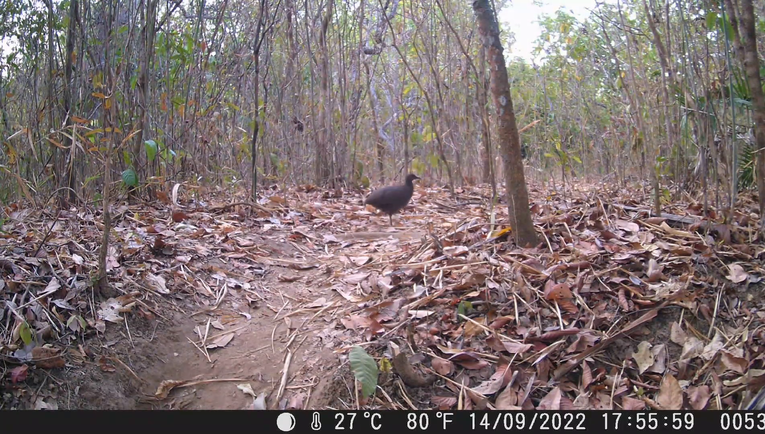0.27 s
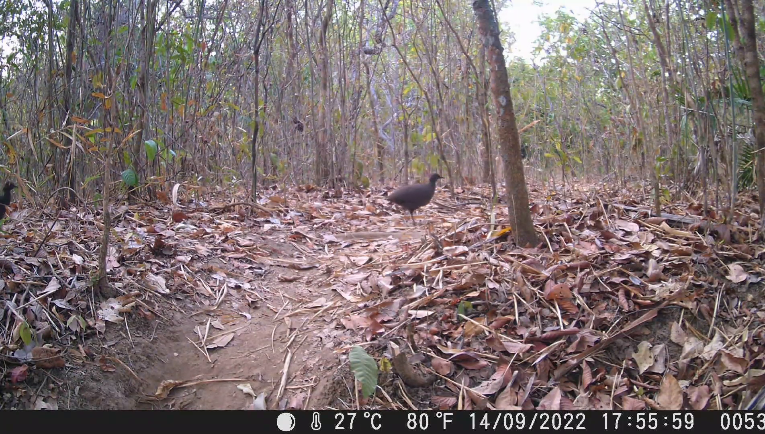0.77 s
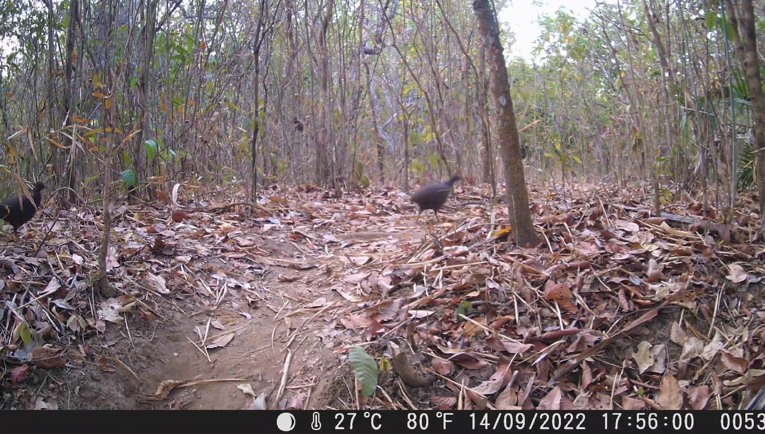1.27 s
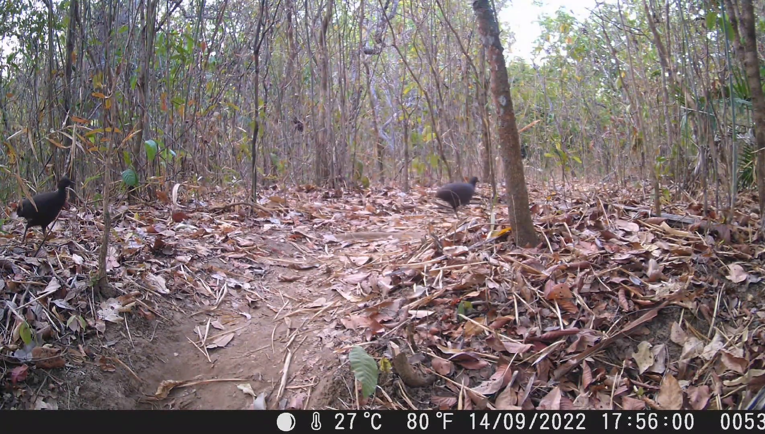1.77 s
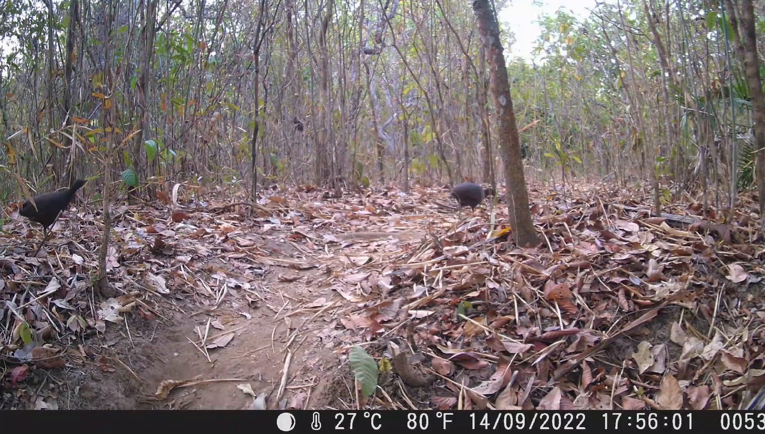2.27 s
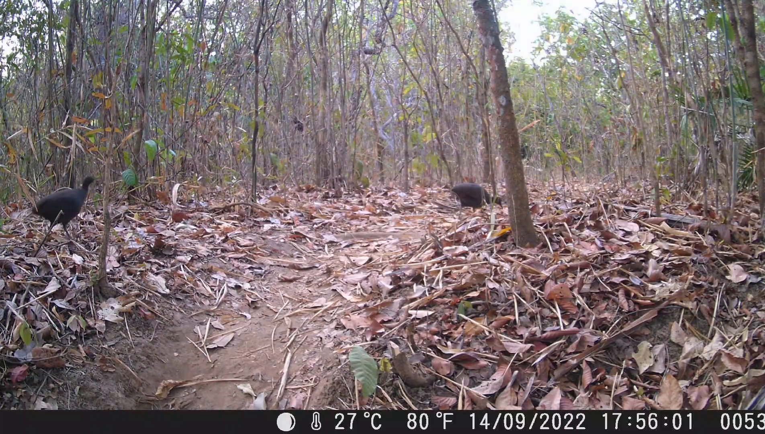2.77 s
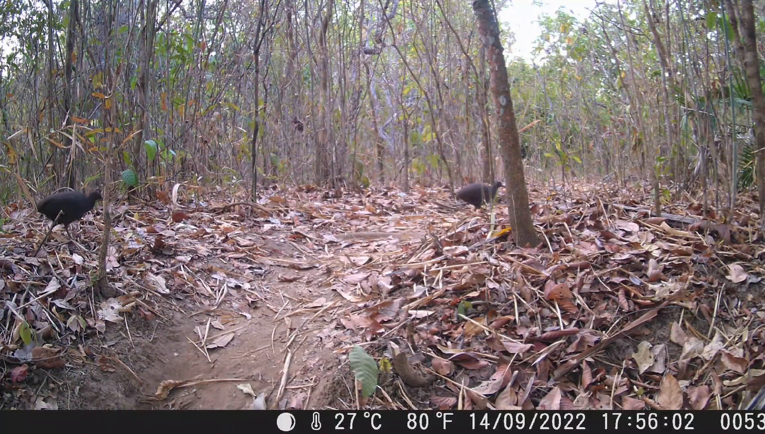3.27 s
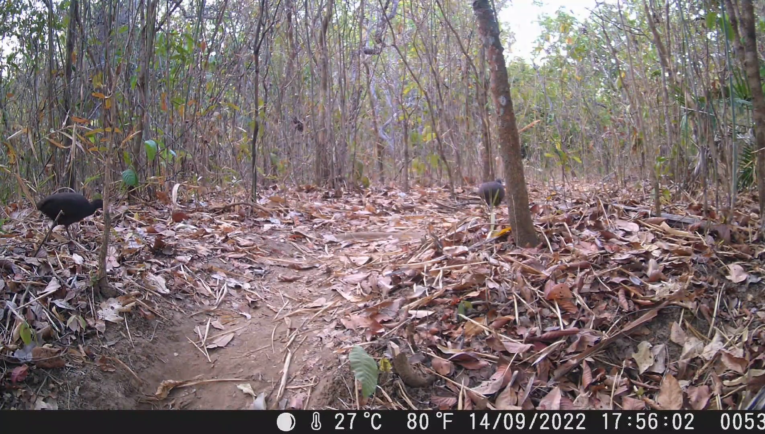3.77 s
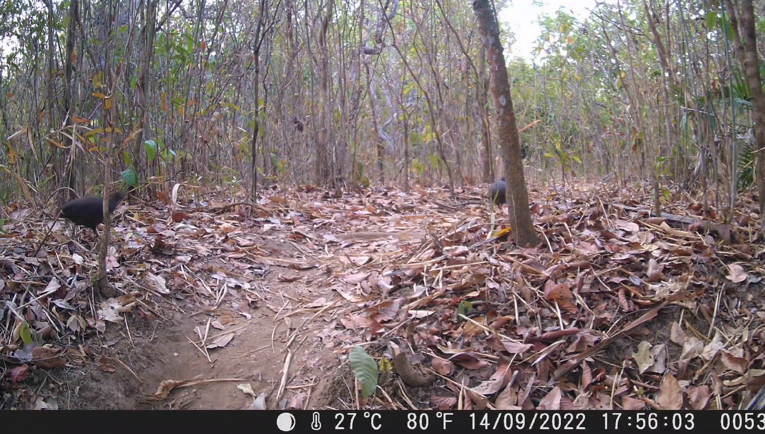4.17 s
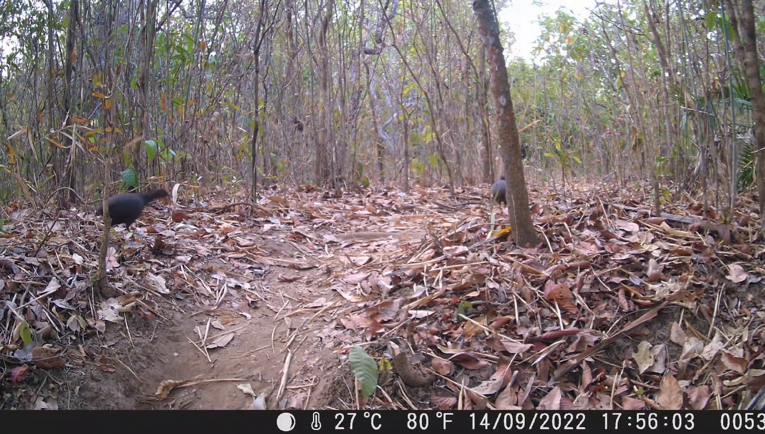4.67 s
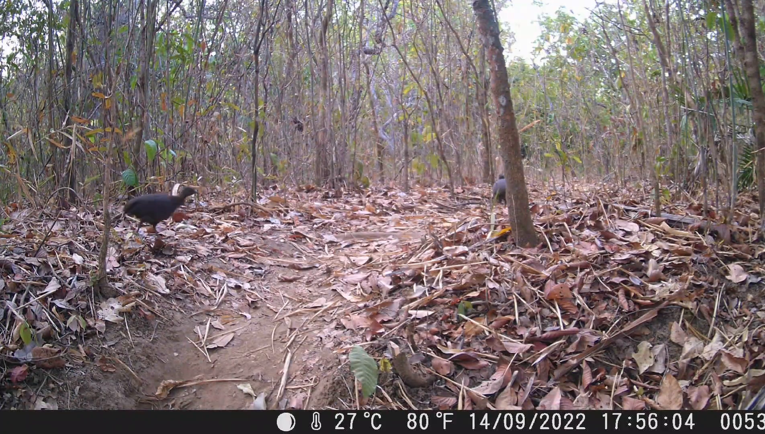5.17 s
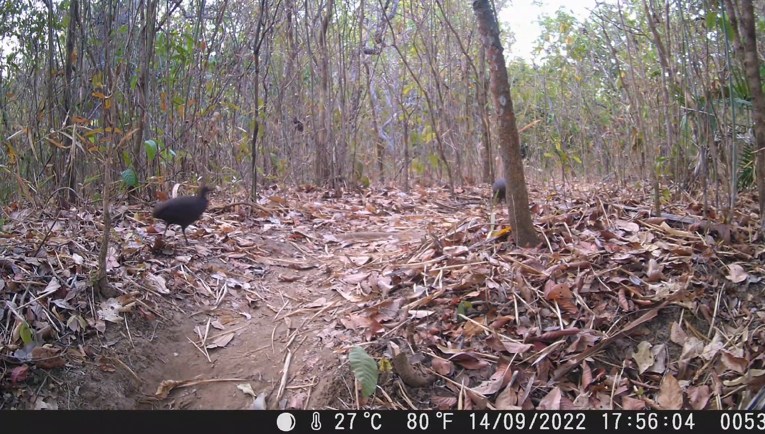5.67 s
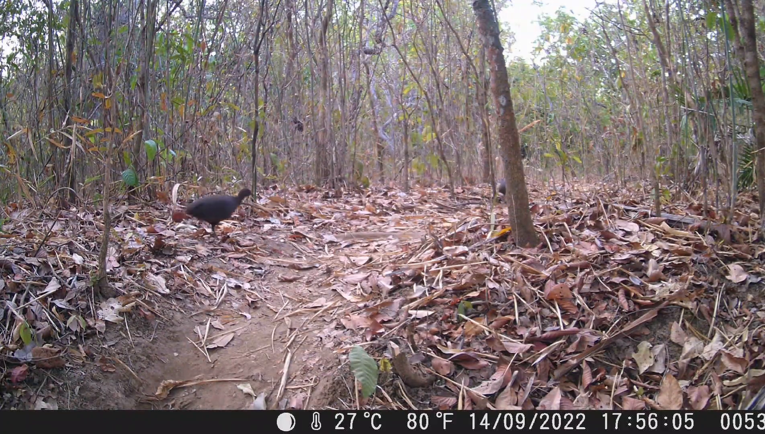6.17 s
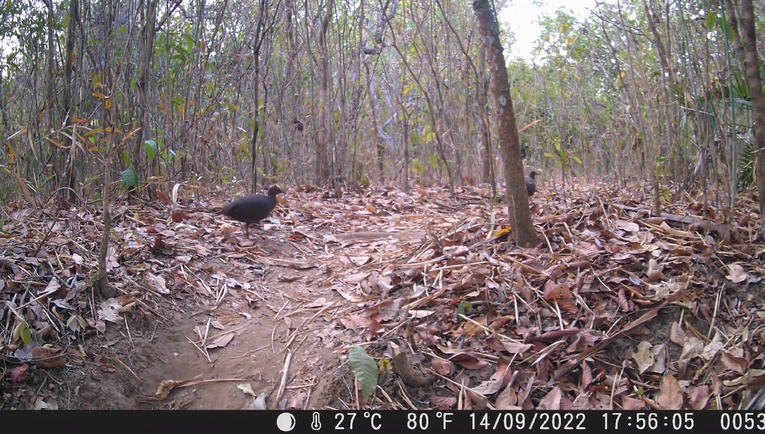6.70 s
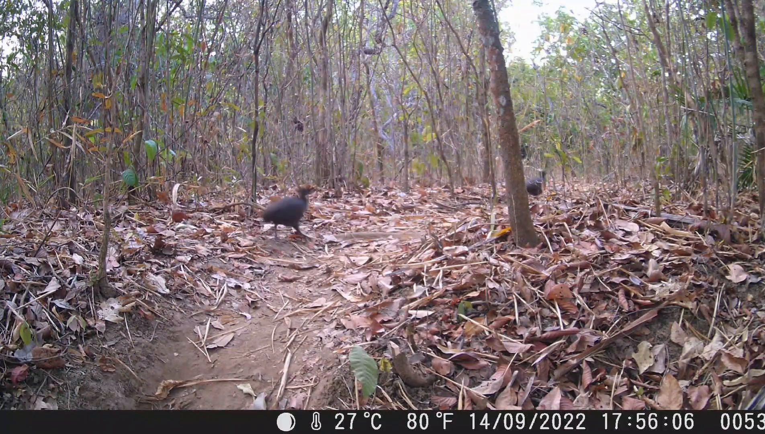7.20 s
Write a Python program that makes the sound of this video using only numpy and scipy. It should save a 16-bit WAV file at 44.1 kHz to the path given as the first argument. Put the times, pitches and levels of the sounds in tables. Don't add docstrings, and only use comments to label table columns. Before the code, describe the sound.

Pure bird pipes ring out singly, then a bubbling two-bird whistled duet bursts in mid-way, over far birdsong, faint dove coos, rumbling air and dry leaf clicks.

```python
import sys
import numpy as np
from scipy import signal
from scipy.fft import rfft, irfft
from scipy.io import wavfile
from scipy.ndimage import uniform_filter1d

SR = 44100
rng = np.random.default_rng(int(sys.argv[2]) if len(sys.argv) > 2 else 0)


def boost_factor(decibels):
    exponent = np.asarray(decibels, float) / 20
    return 10 ** exponent


def wrap_up_sound(samples):
    columns = np.atleast_2d(samples).T
    tamed = np.clip(columns, -1, 1)
    steps = np.round(tamed * 32767).astype(np.int16)
    wavfile.write(sys.argv[1], SR, steps)


N = 328104


def band(x, low_hz, high_hz, order=2):
    return signal.sosfilt(signal.butter(order, [low_hz, high_hz], "band", fs=SR, output="sos"), x)


def drift(rate):
    knots = rng.standard_normal(3000)
    return np.interp(np.arange(N) / SR * rate, np.arange(3000), knots) * 1.32


def tone(hz, gain, second_db):
    phase = 2 * np.pi * np.cumsum(hz) / SR
    return np.sqrt(2) * gain * (np.sin(phase) + boost_factor(second_db) * np.sin(2 * phase))


def arches(rows, effort, fade_s, second_db, throat=((1, 0), (2, 0)), bend=2.7):
    hz = np.zeros(N)
    for s, length, start, middle, end in rows:
        i = round(s * SR)
        u = np.linspace(-1, 1, round(length * SR))
        tilt = (end - start) / 2 * u
        arch = ((start + end) / 2 - middle) * abs(u) ** bend
        hz[i:i + len(u)] = middle + tilt + arch
    sung = np.flatnonzero(hz)
    gain = (hz > 0) * boost_factor(np.interp(np.arange(N) / SR, *np.transpose(effort)))
    hz = uniform_filter1d(np.interp(np.arange(N), sung, hz[sung]), size=90)
    width = max(round(fade_s * SR), 3)
    gain = uniform_filter1d(uniform_filter1d(gain, width), width)
    throat_gain = boost_factor(np.interp(hz, *np.transpose(throat)))
    return tone(hz, gain * throat_gain, second_db)


def trunks(x, t60, wet_db, gap_s):
    t = np.arange(SR) / SR
    tail = rng.standard_normal(SR) * boost_factor(-60 * t / t60) * np.clip(t / gap_s, 0, 1)
    tail /= np.sqrt(np.sum(tail ** 2))
    return boost_factor(wet_db) * signal.fftconvolve(x, tail)[:N]


def air():
    # (f/Hz, density/dB per Hz)
    air_colour = [(12, -32), (20, 8.5), (46, -4.5), (118, -16), (664, -31.5), (1120, -34.5), (2360, -39.5),
                  (3740, -46), (4700, -50), (5600, -51.5), (6400, -49), (7200, -48), (8100, -49),
                  (8800, -67.5)]
    hz = np.maximum(np.arange(N // 2 + 1) * SR / N, 1)
    corner_hz, corner_db = np.transpose(air_colour)
    colour = boost_factor(np.interp(np.log(hz), np.log(corner_hz), corner_db))
    noise = irfft(rfft(rng.standard_normal(N)) * colour, N)
    noise *= boost_factor(-50) / np.std(noise)
    rumble = band(noise, 21, 340, order=1)
    return noise + rumble * (boost_factor(2.1 * drift(rate=16)) - 1)


def haze():
    # (t/s, level/dB)
    flares = [(0, -50.5), (.21, -50.5), (.48, -52.5), (.63, -39.5), (.87, -45.5), (1.18, -58), (1.3, -41),
              (1.96, -53.5), (2.09, -49.5), (2.9, -51), (3.17, -70), (3.27, -72.5), (3.52, -60.5),
              (3.58, -50), (4.27, -60), (4.4, -44), (5.08, -59), (5.8, -60.5), (5.93, -52), (6.15, -52.5),
              (6.38, -54.5), (6.67, -58), (6.8, -55)]
    rise_db_per_s, fade_db_per_s = 217.5, 131.5
    chirps = np.zeros(N + 3000)
    u = np.linspace(0, 1, 900)
    for when, pitch, spread, bend in rng.random((2000, 4)):
        i = int(when * N)
        hz = (2700 + 760 * (pitch + spread)) * (1 + 0.3 * (bend - 0.75) * u)
        chirps[i:i + len(u)] += tone(hz, np.sin(np.pi * u), second_db=-28.5)
    t = np.arange(N) / SR
    slopes = [db - np.maximum(rise_db_per_s * (s - t), fade_db_per_s * (t - s)) for s, db in flares]
    haze_gain = boost_factor(np.max(slopes, axis=0) - 9.5)
    return haze_gain * trunks(chirps[:N], t60=0.21, wet_db=-2, gap_s=0.011)


def song_notes():
    # (t/s, length/s, f/Hz, fall/Hz, level/dB)
    closing = [(0, 0.23, 1195, 15, -77), (0, 0.014, 3795, 400, -48), (0.247, 0.031, 2473, 540, -54),
               (0.687, 0.028, 2960, 35, -57), (1.411, 0.099, 2122, 34, -52.5),
               (1.541, 0.075, 2079, 150, -56), (1.66, .13, 1995, 27, -68.5),
               (2.214, 0.056, 2340, 210, -55.5), (2.316, 0.099, 2460, 360, -64),
               (2.384, 0.057, 2118, 58, -59), (3.041, 0.042, 2405, 5, -66.5), (3.143, .053, 2370, 340, -65),
               (3.781, .084, 1977, 86, -59), (3.85, 0.13, 1892, 4.2, -62), (5.221, 0.066, 2420, 197, -61),
               (5.371, 0.035, 2390, 435, -63), (5.411, 0.038, 1932, 33, -58),
               (6.41, .039, 2817, 680, -63.5), (6.417, 0.034, 2167, 223, -58), (6.72, .08, 2866, 83, -60),
               (6.961, 0.048, 2030, 51, -58), (7.01, 0.053, 2345, 83, -64.5),
               (7.076, 0.066, 2336, 600, -64), (7.137, 0.076, 1930, 91, -61.5)]
    # (t/s, length/s, end f/Hz, level/dB)
    falls = [(0.876, .07, 2344, -61), (1.345, 0.054, 2181, -57), (2.086, .13, 2370, -59.5),
             (2.944, .074, 2545, -73), (3.656, 0.086, 2116, -60), (5.15, .083, 2460, -76),
             (6.815, 0.13, 2060, -59)]
    # (t/s, opening level/dB, tumble level/dB, body level/dB, time stretch)
    sung = [(.423, -59.5, -65.5, -57.5, 0.88), (1.107, -56, -52.5, -54, 0.96),
            (1.866, -56, -54, -52.5, 0.98), (2.697, -60, -82, -66.5, .99), (3.425, -59, -67, -59, 0.92),
            (4.201, -56, -68, -56.5, 1.06), (4.891, -65, -82, -68.5, 1.09), (5.726, -58, -60, -57.5, 1.06),
            (6.617, -57, -63.5, -57.5, 0.82)]
    # (t after its start/s, length/s, start f/Hz, end f/Hz, level in its part/dB)
    opening = [(.008, 0.017, 2285, 2373, 5)]
    tumble = [(.026, .037, 4516, 3450, -9), (.056, .032, 3423, 3285, -0.5)]
    body = [(.085, .065, 3120, 2910, -2.5), (.143, 0.031, 3630, 4005, -4), (.172, .068, 3600, 3380, 3)]
    # (t/s, opening start f/Hz, opening end f/Hz, opening level/dB, level of the rest/dB)
    sung_short = [(.141, 2167, 2100, -58.5, -64), (.785, 2060, 2360, -55, -58),
                  (6.07, 2410, 2310, -55.5, -60), (6.316, 1884, 2290, -56.5, -64)]
    # (t after its start/s, length/s, start f/Hz, end f/Hz, level/dB)
    short_phrase = [
        (.035, 0.04, 4040, 3520, -15.5),
        (.062, .05, 3135, 2786, -0.5),
    ]

    notes = [(s, length, hz, hz - fall, db) for s, length, hz, fall, db in closing]
    notes += [(s, length, 3230, hz, db) for s, length, hz, db in falls]
    for s, *parts_db, stretch in sung:
        for part, part_db in zip((opening, tumble, body), parts_db):
            notes += [(s + stretch * at, length, a, b, db + part_db) for at, length, a, b, db in part]
    for s, start, end, first_db, rest_db in sung_short:
        notes.append((s, 0.03, start, end, first_db))
        notes += [(s + at, length, a, b, db + rest_db) for at, length, a, b, db in short_phrase]
    return [(*note, boost_factor(db)) for *note, db in notes]


def far_song():
    song = np.zeros(N)
    quaver = 1 + 0.005 * drift(rate=250)
    for s, length, start, end, gain in song_notes():
        i = round(s * SR)
        u = np.linspace(0, 1, round(length * SR))
        edge = np.clip(4 * np.minimum(u, 1 - u), 0, 1)
        hz = (start + (end - start) * u) * quaver[i:i + len(u)]
        octave_db = np.interp(hz, [2000, 4000], [-14, -28]) - abs(end - start) / 110
        song[i:i + len(u)] += tone(hz, edge * gain, second_db=octave_db)
    near_trunks = trunks(song, t60=0.4, wet_db=1.5, gap_s=0.0077)
    far_trunks = trunks(song, t60=0.68, wet_db=-6, gap_s=0.13)
    return boost_factor(-4) * song + near_trunks + far_trunks


def cricket():
    # (first group t/s, group period/s, group length/s, pulse rate/Hz)
    strokes = (.07, .2003, .115, 34)
    first, period, length, rate = strokes
    group, t = np.divmod(np.arange(N) / SR - first + period, period)
    strength = boost_factor(-87 + 4.2 * rng.standard_normal(60))[group.astype(int)]
    pulses = np.sin(np.pi * rate * t) ** 2 * (t < length) * boost_factor(3.3 * drift(rate=99))
    return 12 * strength * pulses * band(rng.standard_normal(N), 7650, 8350)


def leaves():
    # (t/s, bright peak level/dB, dull part relative level/dB)
    ticks = [
        (0.458, -70, 8),
        (0.642, -61, 2.5),
        (.779, -74, 6),
        (1.136, -75.5, 18),
        (2.477, -59, -4),
        (2.71, -67.5, 2),
        (6.348, -86, 14),
    ]
    # (t/s, level/dB)
    rustle = [(0, -94), (.5, -91.5), (1.199, -93.5), (1.6, -104), (2.499, -103), (2.997, -108),
              (7.44, -106)]
    bright, dull = np.zeros((2, N))
    for s, db, dull_db in ticks:
        i = round(s * SR)
        bright[i] = boost_factor(db)
        dull[i] = boost_factor(db + dull_db)
    sizes_db = np.interp(np.arange(N) / SR, *np.transpose(rustle))
    sizes_db += 3.3 * np.minimum(rng.exponential(1, N), 3.5)
    patter = (rng.random(N) < 1200 / SR) * boost_factor(sizes_db)
    fade = np.exp(-1 / (0.005 * SR))
    noise = rng.standard_normal((2, N))
    bright_decay = signal.lfilter([1], [1, -fade], bright + 0.85 * patter)
    dull_decay = signal.lfilter([1], [1, -fade], dull + patter)
    crackle = band(noise[0] * bright_decay, 3500, 8000)
    return crackle + 4 * band(noise[1] * dull_decay, 730, 3500)


def piper():
    # (full voice t/s, hold/s, f/Hz, slide down from above/Hz, level/dB)
    piping = [
        (.736, 0.044, 2426, 1, -31.5),
        (1.309, 0.073, 2560, 125, -29.5),
        (3.867, 0.039, 2416, 1, -24.5),
        (4.434, 0.085, 2530, 150, -28),
    ]
    # (delay t/s, level/dB)
    echo_taps = [
        (.045, -20.5),
        (0.129, -34.5),
        (.19, -47),
    ]
    swell_s, swell_db, swell_bend = 0.09, -35.5, 1.49
    release_s, release_db, slide_s = 0.025, -29.5, 0.045
    tire_db_per_s = 11.5
    piped = np.zeros(N)
    for s, hold, hz, slide, db in piping:
        t = np.arange(N) / SR - s
        before = np.maximum(-t / swell_s, 0)
        after = np.maximum((t - hold) / release_s, 0)
        note_db = db + swell_db * before ** swell_bend + release_db * after ** 1.1
        note_db -= tire_db_per_s * np.maximum(t, 0)
        glide = hz + slide * np.exp(-np.maximum(t + swell_s, 0) / slide_s)
        piped += tone(glide, boost_factor(note_db), second_db=-45.5)
    echoes = sum(boost_factor(db) * np.roll(piped, round(delay * SR)) for delay, db in echo_taps)
    echoes = echoes * boost_factor(4.3 * drift(rate=40))
    return piped + echoes + trunks(piped, t60=0.34, wet_db=-29.5, gap_s=0.07)


def dove():
    # (t/s, level/dB)
    calls = [
        (1.071, -56.5),
        (2.93, -68),
        (5.812, -56.5),
    ]
    # (t after its start/s, length/s, start f/Hz, middle f/Hz, end f/Hz)
    coo_shape = [
        (0, .115, 312, 398.3, 418),
        (0.188, 0.034, 399, 400, 380),
    ]
    voice = np.zeros(N)
    for s, db in calls:
        rows = [(s + at, *arch) for at, *arch in coo_shape]
        voice += arches(rows, [(s, db)], fade_s=0.009, second_db=-28)
    return voice + trunks(voice, t60=0.16, wet_db=-5.5, gap_s=0.014)


def duet():
    # (t/s, length/s, start f/Hz, middle f/Hz, end f/Hz)
    first_bird = [(2.690, .045, 1829, 1852, 1855), (2.720, 0.032, 1806, 1786, 1762),
                  (2.754, 0.088, 1676, 1828, 1751), (2.848, .03, 1692, 1758, 1451),
                  (2.993, 0.033, 1414, 1524, 1600), (3.023, 0.06, 1552, 1735, 1599),
                  (3.490, 0.052, 1895, 1800, 1839), (3.552, .078, 1754, 1852, 1609),
                  (3.630, 0.041, 1410, 1600, 1171), (3.782, 0.029, 1208, 1437, 1415),
                  (3.812, 0.051, 1390, 1640, 1298)]
    second_bird = [(3.290, 0.053, 1763, 1790, 1448), (3.348, 0.066, 1406, 1808, 1480),
                   (3.432, .060, 1367, 1660, 1733), (3.492, 0.088, 1722, 1740, 1773),
                   (3.542, .039, 1725, 1687, 1437), (3.682, .062, 1319, 1802, 1432),
                   (3.768, .040, 1466, 1733, 1826), (3.808, 0.079, 1805, 1741, 1513),
                   (4.010, .045, 1790, 1798, 1262), (4.064, 0.061, 1235, 1805, 1248),
                   (4.162, 0.0342, 1260, 1490, 1680), (4.202, 0.1, 1617, 1539, 1374),
                   (4.392, 0.045, 1510, 1750, 1322), (4.474, 0.029, 1350, 1575, 1690),
                   (4.508, .079, 1693, 1490, 1200)]
    # (t/s, first crest f/Hz, valley f/Hz)
    trill_starts = [
        (2.886, 1641, 1390),
        (3.675, 1445, 1171),
    ]
    # (t/s, level/dB)
    first_effort = [(2.69, -46.5), (2.74, -37), (2.86, -34.5), (2.94, -35.5), (2.98, -35), (3.06, -39.5),
                    (3.5, -31.5), (3.68, -35.5), (3.82, -35)]
    second_effort = [(3.3, -34), (3.4, -37.5), (3.535, -32), (3.56, -38.5), (3.701, -34), (3.86, -38.5),
                     (4.02, -32), (4.25, -36), (4.41, -37.5), (4.5, -34)]
    # (f/Hz, level/dB)
    duet_throat = [(1100, -34.5), (1350, -10.5), (1550, -7), (1670, -4), (1745, 1.7), (1830, -2.15),
                   (2000, 8.5)]
    # (t/s, peak level/dB)
    rasps = [
        (2.683, -58),
        (3.288, -52.5),
        (3.478, -44.5),
        (3.995, -42.5),
    ]

    beat_s, arch_s, sag_hz = 0.0375, 0.029, 51.6
    trills = [(s + k * beat_s, arch_s, valley, crest - k * sag_hz, valley)
              for s, crest, valley in trill_starts for k in range(3)]
    voices = arches(first_bird + trills, first_effort, 0.008, -45, duet_throat)
    voices = voices + arches(second_bird, second_effort, 0.0083, -47, duet_throat)
    t = np.arange(N) / SR
    puffs = sum(boost_factor(db) * np.exp(-((t - s) / 0.024) ** 2) for s, db in rasps)
    voices = voices + 2.9 * puffs * band(rng.standard_normal(N), 1750, 2310, order=4)
    echo = boost_factor(-19) * np.roll(voices, round(0.029 * SR))
    return voices + echo + trunks(voices, t60=0.3, wet_db=-21.5, gap_s=0.049)


def sweeper():
    # (t/s, length/s, start f/Hz, middle f/Hz, end f/Hz)
    sweeps = [
        (3.118, .19, 4800, 3870, 3233),
        (3.465, .05, 4812, 4266, 4050),
        (3.515, .114, 4040, 3620, 3284),
    ]
    # (t/s, level/dB)
    sweep_effort = [(3.15, -62), (3.205, -78.5), (3.26, -58), (3.49, -62), (3.535, -57.5), (3.6, -52)]
    voice = arches(sweeps, sweep_effort, fade_s=0.012, second_db=-40.5, bend=2.4)
    return voice + trunks(voice, t60=0.36, wet_db=-7, gap_s=0.01)


def scene():
    birds = haze() + far_song() + piper() + dove() + duet() + sweeper()
    return (air() + cricket() + leaves() + birds)[None]


def low_pass(x):
    return signal.sosfilt(signal.butter(12, 15700, fs=SR, output="sos"), x)


def record(dry):
    x = signal.lfilter(*signal.iirnotch(3200, 22, fs=SR), dry)
    x = signal.sosfilt(signal.cheby2(10, 45, 9000, fs=SR, output="sos"), x)
    whistle = band(x, 2150, 2750)
    overload = 0.075
    clipped_off = np.clip(whistle, -1.012 * overload, overload) - whistle
    x = x + boost_factor(3) * band(clipped_off, 5000, 15500)
    x = x + boost_factor(-90) * band(rng.standard_normal(x.shape), 6100, 16000)
    return low_pass(x)


dry = scene()
out = record(dry)
wrap_up_sound(out)
```